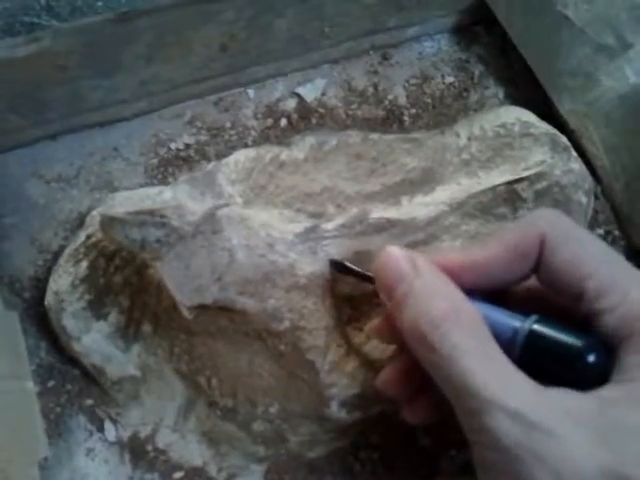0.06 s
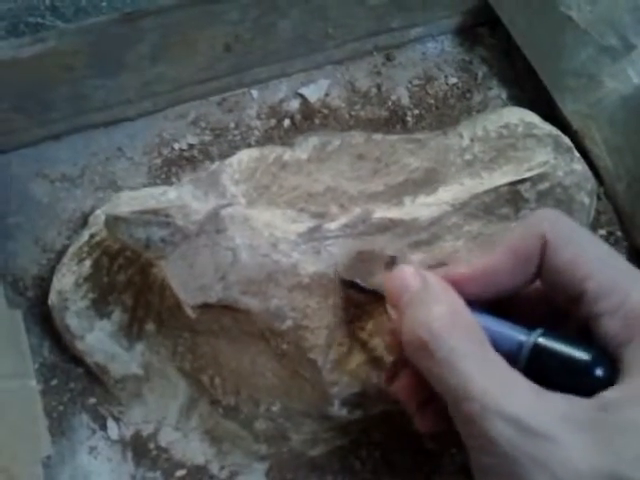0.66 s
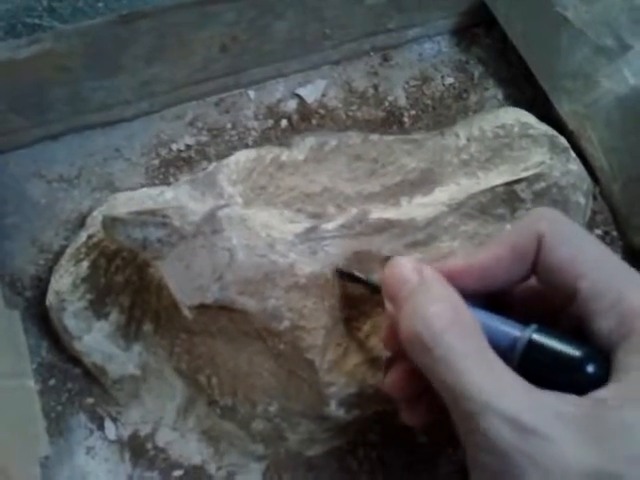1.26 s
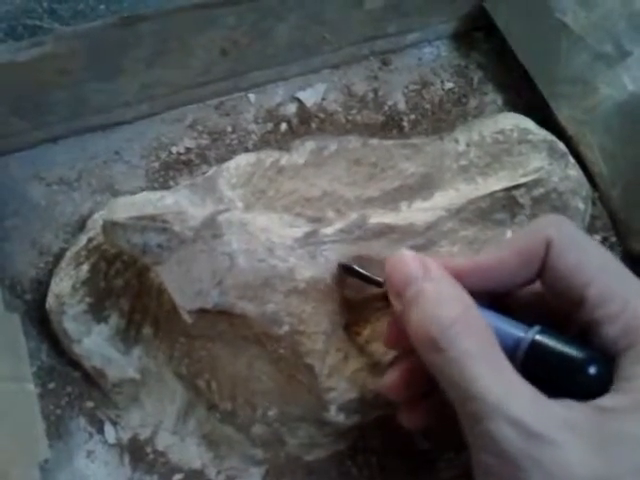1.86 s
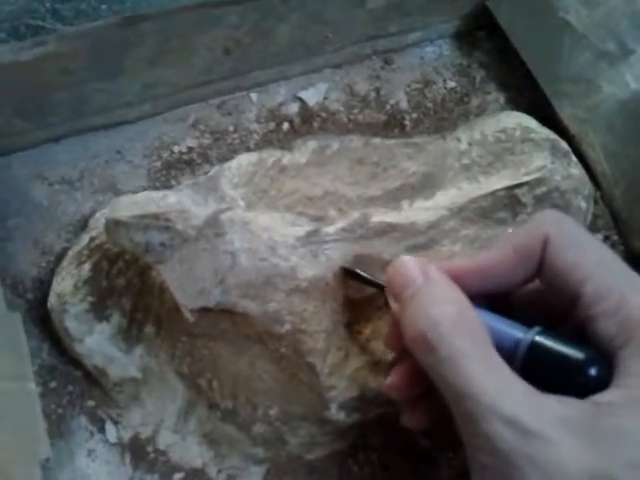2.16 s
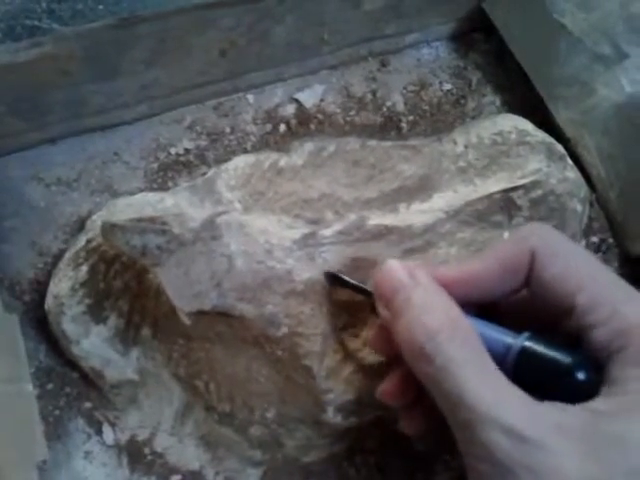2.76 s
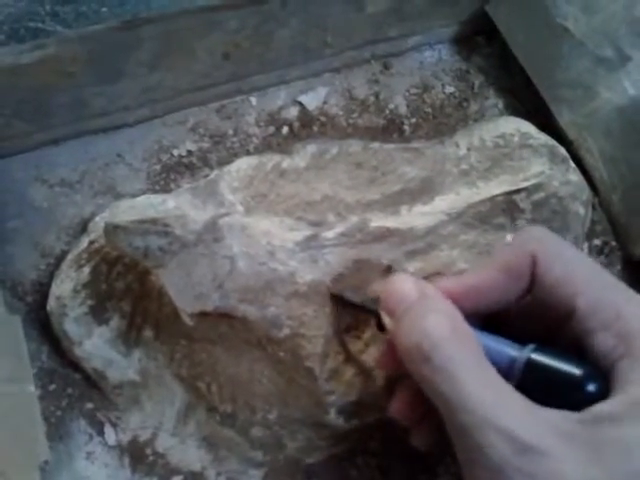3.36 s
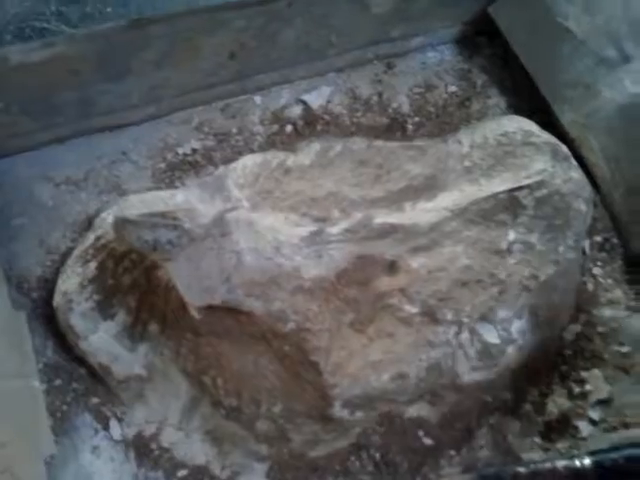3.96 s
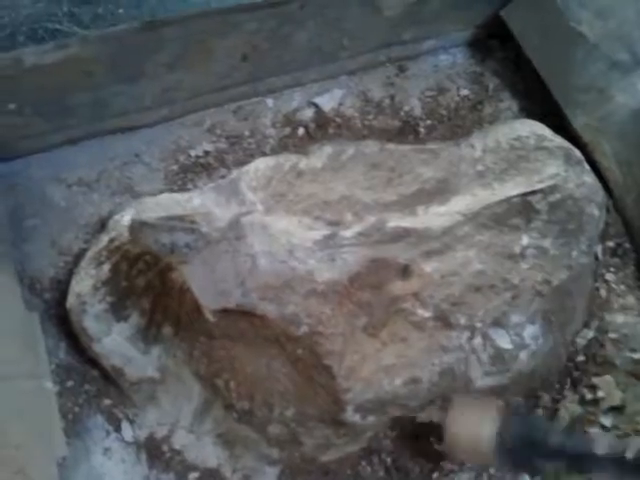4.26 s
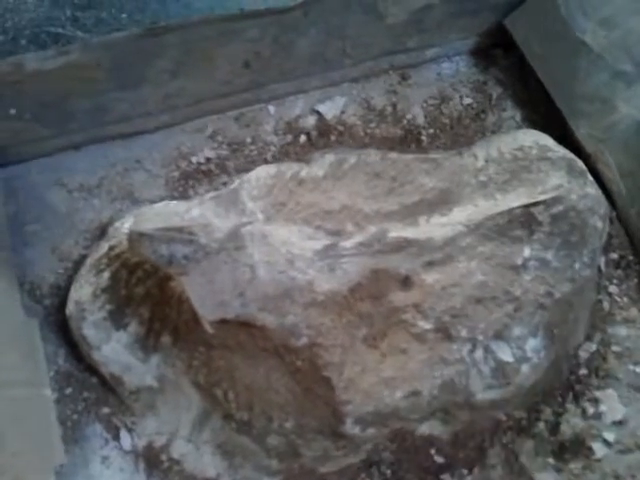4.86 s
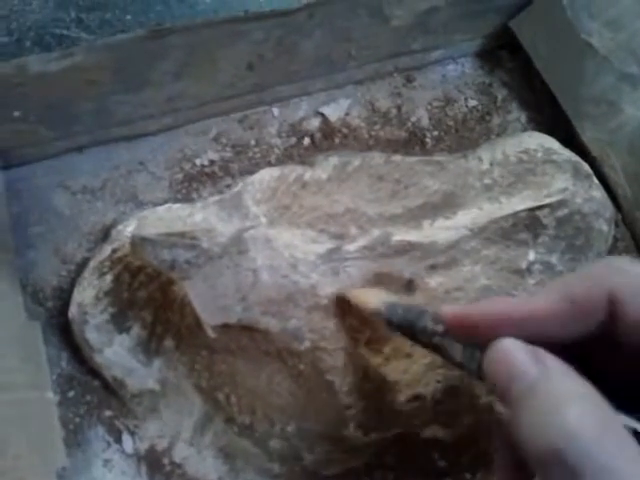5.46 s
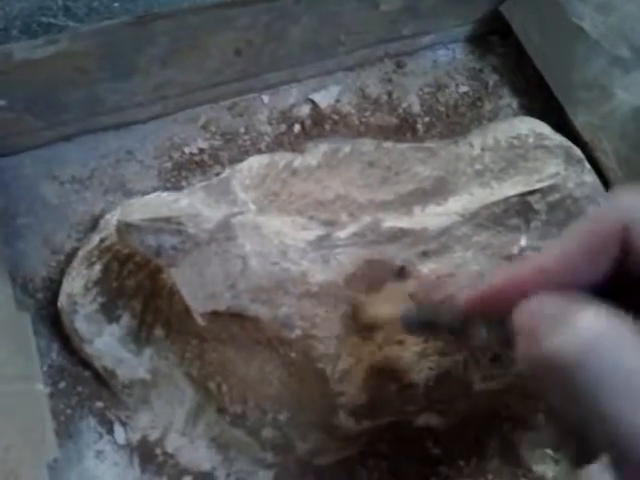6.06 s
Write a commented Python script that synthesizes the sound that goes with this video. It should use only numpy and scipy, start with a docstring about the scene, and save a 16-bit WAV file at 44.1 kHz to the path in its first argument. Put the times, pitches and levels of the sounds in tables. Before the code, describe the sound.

From the start until about 3.5 seconds, a steel pick scratches soft stone close by in short, dry strokes, about four a second. The tip taps down, drags and snaps off crumbs with sharp, gritty clicks. A faint, thin squeak sounds at the very beginning. At 3.6 seconds the pick is laid in a gritty tray with a knock, then slides and knocks again around 4.2. At 4.9 comes a hard metallic clack with a short ring, followed by scraping and loud knocks until 5.3 as a brush is picked up. From 5.5 to about 6.2 seconds, bristles dust the stone in a few very soft sweeps. The room is small, with a slight, short echo. Underneath are quiet room noise, electrical hum and a faint low drone, like a far engine, that slowly rises in pitch and fades after 4 seconds.

```python
"""In a small room, a steel pick scratches soft stone close by: it taps down, drags and breaks off crumbs.
The pick is laid in a gritty tray. A brush is picked up with a clack and a scrape, then softly dusts
the stone. Each touch is a burst of tiny breaking grains that makes the tool and the stone or tray ring.
Behind it are room noise, mains hum, a brief squeak and a faint, slowly rising drone like a far engine."""
import sys
import numpy as np
from scipy import signal
from scipy.fft import rfft, irfft, next_fast_len
from scipy.io import wavfile
from scipy.ndimage import map_coordinates

SR = 44100
rng = np.random.default_rng(int(sys.argv[2]) if len(sys.argv) > 2 else 0)


def to_wav(sig):
    """Store sig (one row per channel, or 1-D mono) as 16-bit WAV at the path in sys.argv[1].

    Samples outside -1..1 are clipped; the rate is SR.
    """
    pcm = np.clip(np.atleast_2d(sig), -1, 1) * 32767
    pcm = np.round(pcm).astype(np.int16)
    wavfile.write(sys.argv[1], SR, pcm.T)  # frames by channels


N = 273861
TIME_S = np.arange(N) / SR


def amp(db):
    """Turn decibels into a number to multiply by."""
    return 10 ** (np.asarray(db) / 20)

def unit(x):
    """Scale a sound to an average power of 1."""
    return x / np.sqrt(np.mean(x ** 2) + 1e-20)

def along(points, hz):
    """Read between (frequency_hz, value) points on a log frequency axis."""
    frequencies, values = np.transpose(points)
    return np.interp(np.log(hz + 1), np.log(frequencies + 1), values)

def curves(rows):
    """One value per sample for each column after the time."""
    times, *columns = np.transpose(rows)
    return [np.interp(TIME_S, times, column) for column in columns]

def wobble(rate, n):
    """A smooth curve of n samples, through `rate` random points a second."""
    return map_coordinates(rng.standard_normal(int(n * rate / SR) + 4), [np.arange(n) * rate / SR])

def add(track, start_s, sound):
    """Mix a sound into the track."""
    start = round(start_s * SR)
    part = sound[max(-start, 0):max(len(track) - start, 0)]
    track[max(start, 0):][:len(part)] += part

def coloured(x, gain_db):
    """Filter x by a gain that depends on frequency."""
    size = 2 * next_fast_len(len(x))
    cepstrum = irfft(np.log(amp(gain_db(np.fft.rfftfreq(size, 1 / SR)))), size)
    # folding this in half makes the ringing come after each hit, never before
    cepstrum[1:size // 2] *= 2
    cepstrum[size // 2 + 1:] = 0
    return irfft(rfft(x, size) * np.exp(rfft(cepstrum)), size)[:len(x)]


# the tone of the room's steady noise: frequency_hz, gain_db
AIR_TONE = [(20, -43.5), (36, -29), (50, -1), (72, -9), (150, -11.5), (310, -23), (600, -22), (1100, -37.5),
            (2200, -28), (2650, -36.5), (4800, -27.5), (6200, -38.5), (9000, -39.5), (16000, -40.5)]
# the tone of the low rumble: frequency_hz, gain_db
RUMBLE_TONE = [(40, -29), (90, -4.5), (175, -0.5), (300, -6.5), (600, -14), (1500, -24), (4000, -48.5)]
# how the rumble swells and sinks: time_s, level_db
RUMBLE_LEVELS = [(0, -53), (1.9, -51), (3.85, -54), (4.25, -50), (4.76, -59.5), (5.12, -51.5),
                 (5.85, -60.5), (6.21, -55.5)]
def room_noise():
    """A steady, soft rush and an uneven low rumble."""
    air = unit(coloured(rng.standard_normal(N), lambda hz: along(AIR_TONE, hz)))
    rumble_db = curves(RUMBLE_LEVELS)[0] + 3.2 * np.tanh(wobble(14, N))
    rumble = unit(coloured(rng.standard_normal(N), lambda hz: along(RUMBLE_TONE, hz)))
    return amp(-59) * air + amp(rumble_db) * rumble

# the notes in the mains hum: pitch_hz, level_db
HUM_NOTES = [(48.8, -61.5), (146, -62), (221, -77.5), (274.5, -68.5), (538.3, -71.5)]
def mains_hum():
    """The mains hums on a few slightly wavering notes."""
    return sum(amp(db) * unit(np.sin(2 * np.pi * hz * TIME_S + 0.28 * wobble(3.9, N)))
               for hz, db in HUM_NOTES)

# the far drone's path: time_s, base_pitch_hz, level_db
DRONE_PATH = [(0, 84.7, -48), (.5, 90, -71), (.88, 94.1, -52), (1.4, 97, -52.5), (2.05, 106.1, -54.5),
              (3.1, 112, -46.5), (3.95, 112.5, -53.5), (4.7, 110.2, -76)]
def far_drone():
    """Three low tones rise slowly together and flutter on their way."""
    pitch_hz, level_db = curves(DRONE_PATH)
    phase = 2 * np.pi * np.cumsum(pitch_hz) / SR
    drone = np.zeros(N)
    for multiple, db in [(0.98, 0), (1.5, -4.5), (2, -7.5)]:
        flutter_db = 4 * np.tanh(wobble(22, N))
        drone += amp(db + flutter_db) * np.sin(multiple * phase + 0.55 * wobble(22, N))
    return amp(level_db) * unit(drone)

# the squeak's path: time_s, pitch_hz, level_db
SQUEAK_PATH = [(0, 566, -50), (.07, 575, -50.5), (.115, 547, -50), (.19, 505, -68)]
# the tones in the squeak: pitch_multiple, level_db
SQUEAK_TONES = [(1, -6.5), (2, -8), (3, -2), (4, 1.5)]
def squeak():
    """A thin, rough squeak sinks and fades in the background."""
    pitch_hz, level_db = curves(SQUEAK_PATH)
    phase = 2 * np.pi * np.cumsum(pitch_hz) / SR
    tones = sum(amp(db + 3.7 * wobble(64, N)) * np.sin(multiple * phase + 0.58 * wobble(126, N))
                for multiple, db in SQUEAK_TONES)
    return amp(level_db) * unit(tones) * (TIME_S < SQUEAK_PATH[-1][0])

# how long the room's echo takes to fade by 60 dB: frequency_hz, fade_s
ECHO_FADES = [(200, 0.21), (2000, 0.22), (5000, 0.19), (14000, 0.4)]
def room_echo(x):
    """A short, blurred echo that changes as the hand moves."""
    out, hop = np.zeros(N), SR // 4
    for start in range(0, N, hop):
        hz, t, spectrum = signal.stft(rng.standard_normal(SR // 2), SR, nperseg=256)
        fade = amp(-60 * t / along(ECHO_FADES, hz)[:, None])
        tail = signal.istft(spectrum * fade, SR, nperseg=256)[1]
        echo = signal.fftconvolve(x[start:start + hop], tail / np.linalg.norm(tail))
        add(out, start / SR + 0.004, echo)
    return out


def grit(n, rate, spread_db, powder):
    """Grains of random size break, `rate` a second, over the even rush of powder."""
    breaks = rng.random(n) < rate / SR
    signs = rng.choice([-1, 1], n)
    sizes = amp(spread_db * np.minimum(rng.exponential(size=n), 4))
    return unit(breaks * signs * sizes) + powder * rng.standard_normal(n)

# the crackle of breaking crumbs: frequency_hz, gain_db
CRACKLE_TONE = [(3000, -39.5), (6500, 0.5), (8300, 2), (10000, 5), (12500, -4.5), (16000, -6)]
# the low boom of the tray floor: frequency_hz, gain_db
THUD_TONE = [(60, -18), (190, -7), (265, 2.5), (340, -4.5), (470, -4), (610, 5), (720, 0), (880, 1.5),
             (1050, -7.5), (2000, -42)]
def contact(force, pressure, tone, bright_db, crackle_db, thud_db):
    """Breaking grains ring with the given tone, crackle and shake the tray; more pressure is louder."""
    tilt = [(2200, -bright_db / 2), (4400, bright_db / 2)]
    # every spot on the stone rings a little differently
    spot = list(zip(np.geomspace(1000, 16000, num=40), rng.normal(0, 2.2, size=40)))
    ring = unit(coloured(force, lambda hz: along(tone, hz) + along(tilt, hz) + along(spot, hz)))
    crackle = unit(coloured(force, lambda hz: along(CRACKLE_TONE, hz) + along(spot, hz)))
    thud = unit(coloured(force, lambda hz: along(THUD_TONE, hz)))
    mix = ring + amp(crackle_db + 2) * crackle + amp(thud_db) * thud
    return unit(mix) * np.sqrt(np.mean(pressure ** 2))

def blow(tone, bright_db, crackle_db, thud_db, crush_s, rise_s, fade_s):
    """One hit crushes grains; partway through crush_s it starts to fade, by 60 dB in fade_s."""
    t = np.arange(SR // 16) / SR
    pressure = np.minimum(t / rise_s, 1) * amp(-60 * np.maximum(t - 0.43 * crush_s, 0) / fade_s)
    pressure *= np.sqrt(0.0057 * SR / np.sum(pressure ** 2))  # same energy for every hit
    force = pressure * grit(len(t), rate=6000, spread_db=2.5, powder=0.89)
    return contact(force, pressure, tone, bright_db, crackle_db, thud_db)

def pressure_db(t, rise_s, hold_s, fall_s):
    """The hand presses, holds from t = 0 and lets go, by 20 dB in each rise_s or fall_s."""
    return 20 * np.minimum(t, 0) / rise_s - 20 * np.maximum(t - hold_s, 0) / fall_s

def drag(tone, db, rise_s, hold_s, fall_s, bright_db, thud_db, slip_db):
    """Pressure builds, holds and lets go while the steel sticks and slips over the grains."""
    t = np.arange(-2 * rise_s, hold_s + 2 * fall_s, 1 / SR)
    pressure = amp(pressure_db(t, rise_s, hold_s, fall_s))
    slips = amp(slip_db * np.tanh(wobble(261.4, len(t))))
    force = pressure * slips * grit(len(t), rate=2200, spread_db=2, powder=0.74)
    crackle_db = -16.5 - 0.5 * (db + 38)  # a lighter drag has a greater share of crackle
    return amp(db) * contact(force, pressure, tone, bright_db - 3, crackle_db, thud_db)


# steel working on stone, also used for the brush and pick below: frequency_hz, gain_db
STONE_TONE = [(100, -24.5), (850, -35), (1150, -8.5), (1500, -1.5), (1780, -5.5), (2150, 2.5),
              (2680, -15.5), (3150, -5), (3750, -10.5), (4400, -0.5), (5000, 0.5), (5900, -14.5),
              (6900, -17), (8000, -35), (16000, -37.5)]
def hiss():
    """A fine, gritty hiss dies away as the work goes on."""
    force = amp(2.4 * wobble(25.23, N)) * grit(N, rate=760, spread_db=4, powder=0.93)
    sound = contact(force, np.ones(N), STONE_TONE, bright_db=2, crackle_db=-12.5, thud_db=-11)
    return amp(-53.5 - 6 * TIME_S) * sound

# sweeps of the brush: middle_s, level_db
BRUSH_SWEEPS = [(5.53, -72), (5.65, -65.5), (5.804, -59.5), (6.061, -61.5), (6.169, -64)]
def brush():
    """Soft bristles push dust across the stone."""
    out, sweep_s = np.zeros(N), 0.13
    pressure = np.hanning(int(sweep_s * SR))
    for middle_s, db in BRUSH_SWEEPS:
        force = pressure * grit(len(pressure), rate=2200, spread_db=4.5, powder=0.68)
        sweep = contact(force, pressure, STONE_TONE, bright_db=12, crackle_db=-10, thud_db=-3)
        add(out, middle_s - sweep_s / 2, amp(db) * sweep)
    return out

# the tone of a tool lying in the tray: frequency_hz, gain_db
TRAY_TONE = [(100, -65.5), (850, -16.5), (1250, -8), (1520, -3), (2200, 1.5), (2800, -16), (3700, -4),
             (4300, -1), (4950, 2), (5800, -8), (6800, -15.5), (8000, -30.5), (16000, -63.5)]
# tools knock in the tray: start_s, level_db, bright_db, thud_db
TRAY_KNOCKS = [(3.6105, -26.5, -2, -19), (3.617, -25.5, -0.5, -13.5), (3.6608, -37, -1.5, -10),
               (4.1708, -29.5, 2, -41), (4.1828, -24.5, 8, -29), (4.213, -30, 20, -41),
               (5.027, -30, 8.5, -19.5), (5.137, -29.5, 9.5, -31.5), (5.1666, -15.5, -2.5, -17),
               (5.173, -16.5, -7, -17.5), (5.2268, -26, -4.5, -26.5)]
# tools slide in the grit: full_pressure_s, rise_s, hold_s, fall_s, level_db, bright_db, thud_db
TRAY_SLIDES = [(3.62, 0.013, .007, 0.13, -40, 7, -7.5), (4.137, 0.049, 0.14, 0.033, -36, 4.5, -14.5),
               (4.182, .015, 0.01, 0.046, -33.5, 7, -19), (4.449, 0.0067, 0.014, 0.01, -45.5, 11.5, -13),
               (4.945, 0.0096, 0.18, 0.053, -49, 5, -20), (5.032, 0.0053, 0.042, .016, -27, 8.5, -23),
               (5.138, .008, 0.012, .016, -26, 6, -30.5), (5.183, .005, .007, .11, -29, 0.5, -8.5),
               (5.221, .02, .006, .07, -32.5, 1, -9.5)]
def tray():
    """The tools knock, bounce once and slide in the gritty tray."""
    out = np.zeros(N)
    for start_s, db, bright_db, thud_db in TRAY_KNOCKS:
        knock = blow(TRAY_TONE, bright_db, crackle_db=-23, thud_db=thud_db,
                     crush_s=0.0044, rise_s=0.00088, fade_s=0.026)
        add(out, start_s, amp(db) * knock)
        add(out, start_s + 0.0054, amp(db - 14.5) * knock)  # the bounce
    for full_s, rise_s, hold_s, fall_s, db, bright_db, thud_db in TRAY_SLIDES:
        slide = drag(TRAY_TONE, db, rise_s, hold_s, fall_s, bright_db, thud_db, slip_db=4)
        add(out, full_s - 2 * rise_s, slide)
    return out

# the tone of metal on metal: frequency_hz, gain_db
METAL_TONE = [(100, -41.5), (900, -29), (1250, -10), (1600, -7), (2250, 4), (2750, -5.5), (3700, -7.5),
              (4800, -0.5), (6200, -18.5), (7500, -18.5), (8300, -32.5), (16000, -61.5)]
# the steel shaft's notes, each fading by 60 dB: pitch_hz, level_db, fade_s
SHAFT_NOTES = [(2080, -10, .16), (3560, -5.5, 0.055), (4730, -3, 0.23), (5120, 1.5, 0.22),
               (5200, -3, 0.085)]
# metal strikes metal: start_s, level_db, bright_db, crackle_db, ring_db
METAL_HITS = [(4.729, -39, 1, -13, -60), (4.9299, -15, 1, -29, -29.5)]
def clinks():
    """A hard clack with a quick rebound; the loose steel shaft rings on with a rattle."""
    out, t = np.zeros(N), np.arange(SR // 3) / SR
    for start_s, db, bright_db, crackle_db, ring_db in METAL_HITS:
        clack = blow(METAL_TONE, bright_db, crackle_db, thud_db=-30,
                     crush_s=0.002, rise_s=0.0013, fade_s=0.013)
        add(out, start_s, amp(db) * clack)
        add(out, start_s + 0.0054, amp(db - 9) * clack)  # the rebound
        for hz, note_db, fade_s in SHAFT_NOTES:
            rattle = wobble(230, len(t)) + 0.5 * wobble(1600, len(t))
            note = amp(note_db - 60 * t / fade_s) * np.sin(2 * np.pi * hz * t + rattle)
            add(out, start_s, amp(ring_db + 0.5) * note)
    return out

# the tone of a light touch: frequency_hz, gain_db
TAP_TONE = [(100, -44), (800, -19.5), (1150, -1.5), (1520, -8.5), (2020, 6), (2650, -15.5), (3550, -8.5),
            (4400, 0), (5000, 0.5), (5900, -15), (7000, -12.5), (7800, -24.5), (16000, -36)]
# the tip touches down: start_s, level_db
PICK_TAPS = [(0.0173, -40.5), (0.0415, -36), (.093, -34), (0.169, -36), (0.2773, -31.5), (0.3265, -36),
             (.508, -34), (0.5621, -33.5), (0.6168, -38), (.7634, -31.5), (.8568, -38.5), (1.0728, -45.5),
             (1.1987, -38), (1.285, -43.5), (1.399, -37), (1.4456, -40.5), (1.54, -40), (1.6425, -36),
             (1.7378, -44.5), (1.869, -41), (1.9322, -41.5), (1.9568, -47), (2.162, -46), (2.2933, -40.5),
             (2.6231, -42), (2.836, -39.5), (3.038, -46), (3.4345, -44)]
def pick_taps():
    """The tip lands dully on the stone between strokes."""
    out = np.zeros(N)
    for start_s, db in PICK_TAPS:
        tap = blow(TAP_TONE, bright_db=-5.5, crackle_db=-26.5, thud_db=-19.5,
                   crush_s=0.0017, rise_s=0.0023, fade_s=0.02)
        add(out, start_s + 0.0003, amp(db) * tap)
    return out

def add_sand(out, full_s, hold_s, db, rise_s=0.07, fall_s=0.112):
    """Fine sand crackles under the tip, from the first light touch until after the hand lets go."""
    t = np.arange(-rise_s, hold_s + fall_s, 1 / SR)
    pressure = amp(pressure_db(t, rise_s, hold_s, fall_s))
    force = pressure * grit(len(t), rate=560, spread_db=3.5, powder=0.6)
    sand = contact(force, pressure, STONE_TONE, bright_db=8, crackle_db=2, thud_db=-24)
    add(out, full_s - rise_s, amp(db) * sand)

STROKE_RISE_S, STROKE_FALL_S = 0.028, 0.035
def add_crumbs(out, full_s, hold_s, db, bright_db, count=6, per_second=45):
    """Once the tip has bitten, small crumbs break at uneven times, louder under more pressure."""
    delays_s = (np.arange(count) + rng.uniform(-0.5, 0.5, size=count)) / per_second
    levels_db = db + 3 * np.tanh(rng.standard_normal(count))
    levels_db += 0.72 * pressure_db(delays_s, STROKE_RISE_S, hold_s, STROKE_FALL_S)
    for delay_s, level_db in zip(delays_s, levels_db):
        crumb = blow(STONE_TONE, bright_db, crackle_db=-20.5, thud_db=-24,
                     crush_s=0.003, rise_s=0.0007, fade_s=0.014)
        add(out, full_s + delay_s, amp(level_db) * crumb)

# the pick drags over the stone: full_pressure_s, hold_s, level_db, bright_db
PICK_STROKES = [(.19, 0.023, -37, -1.5), (0.43, 0.019, -35.5, 2.5), (.656, 0.015, -37, 5.5),
                (0.897, 0.017, -37.5, 3), (1.106, 0.026, -39.5, 0.5), (1.328, 0.014, -37, 6),
                (1.562, 0.0092, -37.5, 5), (1.597, .02, -50, 4), (1.781, 0.0058, -42, 3.5),
                (1.988, .03, -41, -0.5), (2.2, 0.038, -42.5, 1), (2.406, 0.0087, -40.5, 2),
                (2.637, .034, -45, 6), (2.844, 0.067, -44.5, 1.5), (3.08, .018, -38, 0),
                (3.303, 0.021, -33.5, 5.5), (3.461, .03, -39.5, 4), (3.532, 0.017, -46.5, 9.5)]
def pick_strokes():
    """The tip scrapes the stone in short strokes, each loosening sand and small crumbs."""
    out = np.zeros(N)
    for full_s, hold_s, db, bright_db in PICK_STROKES:
        scrape = drag(STONE_TONE, db, STROKE_RISE_S, hold_s, STROKE_FALL_S, bright_db,
                      thud_db=-19, slip_db=10)
        add(out, full_s - 2 * STROKE_RISE_S, scrape)
        add_sand(out, full_s, hold_s, db - 26)
        add_crumbs(out, full_s, hold_s, db - 1, bright_db + 1.5)
    return out

# large crumbs break off: start_s, level_db, bright_db
PICK_CHIPS = [(.202, -26.5, 5.5), (.225, -36, -1), (.248, -32, 6), (0.431, -36, -9), (.44, -27, 12),
              (0.4574, -34.5, 5.5), (.6428, -29, 6), (0.6561, -29.5, 9.5), (0.8852, -29, 2),
              (0.896, -28, 8), (1.1, -35.5, 7), (1.115, -28.5, 8), (1.122, -28, 4.5), (1.3161, -34, -1),
              (1.3263, -28.5, 9), (1.5644, -26, 7), (1.7782, -25, 0), (1.793, -33.5, 10),
              (1.9838, -30.5, -6), (2.0135, -23, 6.5), (2.1859, -36, 10), (2.2177, -27.5, 4.5),
              (2.2457, -31, -3.5), (2.4011, -27, 3), (2.416, -29, -6), (2.6439, -33, 4), (2.657, -36, 10),
              (2.8541, -36, 14), (2.8733, -27, 3), (3.0558, -32, 8), (3.1103, -32, 2), (3.127, -35.5, -1),
              (3.2938, -24.5, 3), (3.2988, -25, 8), (3.461, -29.5, 3.5), (3.4906, -37, 4)]
def pick_chips():
    """The tip snaps large crumbs off the stone, each with a sharp click."""
    out = np.zeros(N)
    for start_s, db, bright_db in PICK_CHIPS:
        chip = blow(STONE_TONE, bright_db, crackle_db=-21.5, thud_db=-27,
                    crush_s=0.0035, rise_s=0.00099, fade_s=0.028)
        add(out, start_s + 0.00025, amp(db) * chip)
    return out


def scene():
    """The close work and its echo in the small room, over the background."""
    background = room_noise() + mains_hum() + far_drone() + hiss()
    work = squeak() + brush() + tray() + clinks() + pick_taps() + pick_strokes() + pick_chips()
    return (background + work + amp(-14) * room_echo(work))[None]

def record(dry):
    """Cut away the very highest treble."""
    size, top_hz = next_fast_len(N + SR // 4), 16100
    kept = np.fft.rfftfreq(size, 1 / SR) < top_hz
    return irfft(rfft(dry, size) * kept, size)[..., :N]


dry = scene()
out = record(dry)
to_wav(out)
```